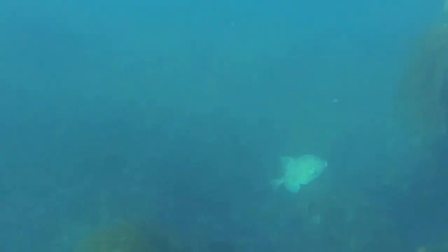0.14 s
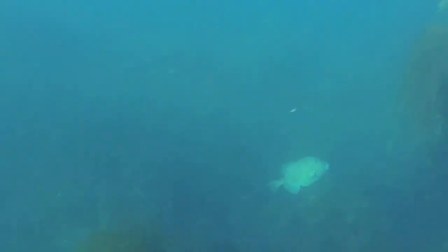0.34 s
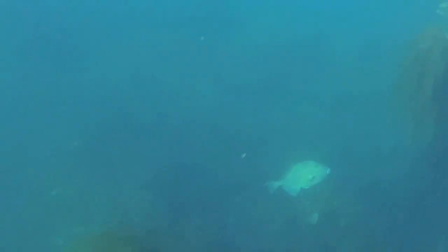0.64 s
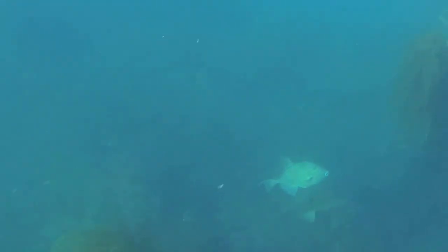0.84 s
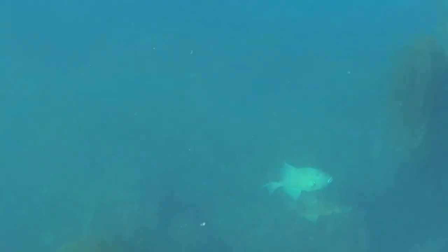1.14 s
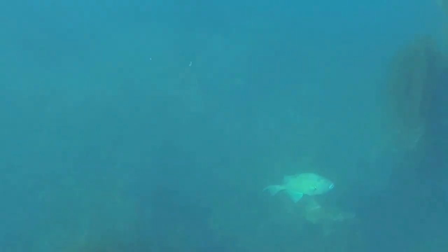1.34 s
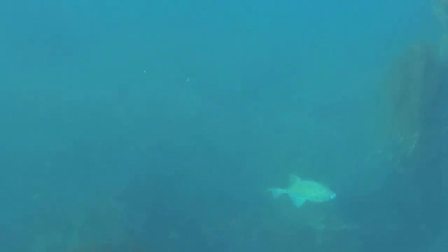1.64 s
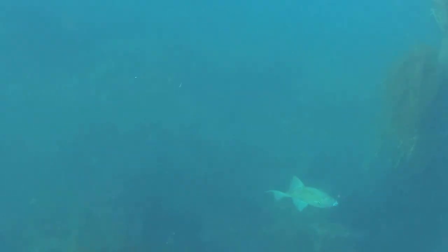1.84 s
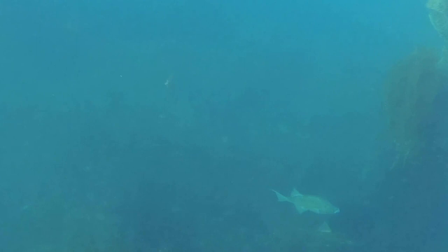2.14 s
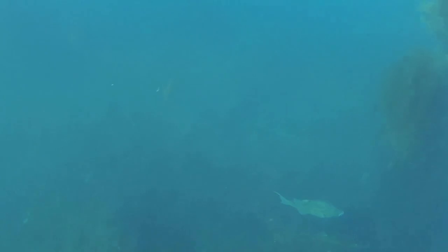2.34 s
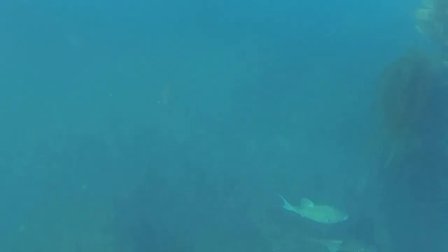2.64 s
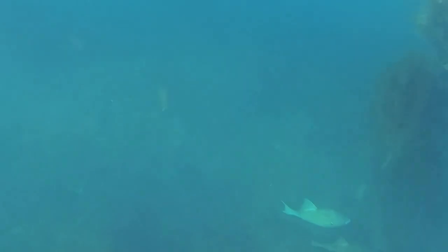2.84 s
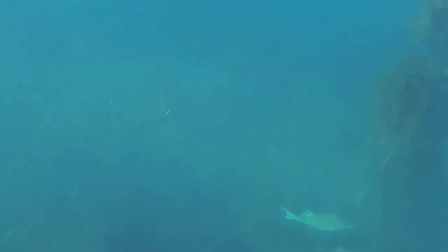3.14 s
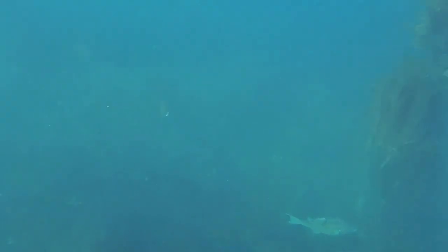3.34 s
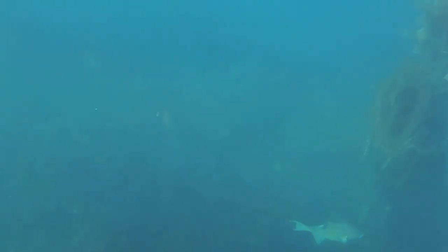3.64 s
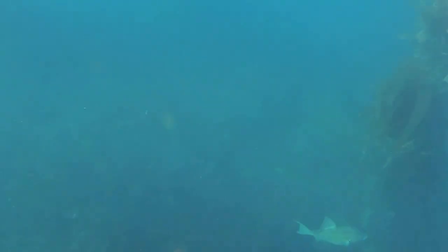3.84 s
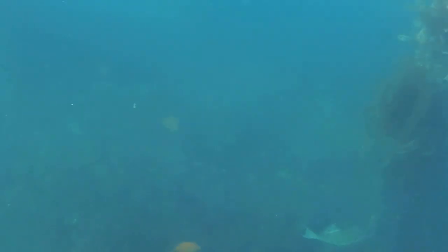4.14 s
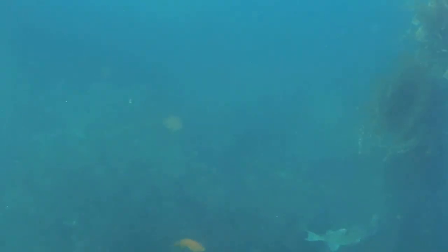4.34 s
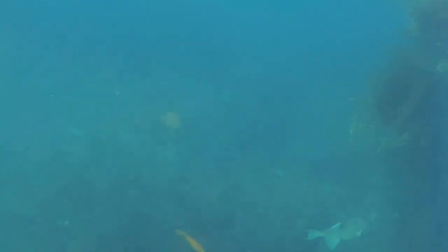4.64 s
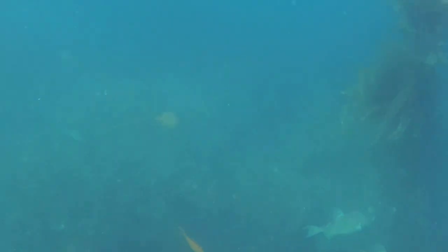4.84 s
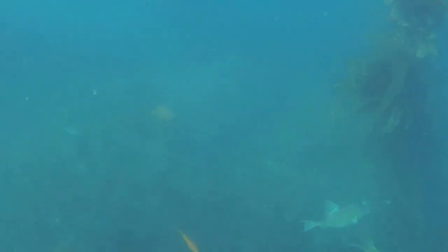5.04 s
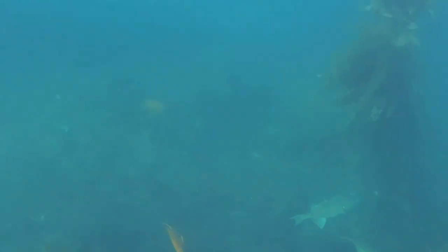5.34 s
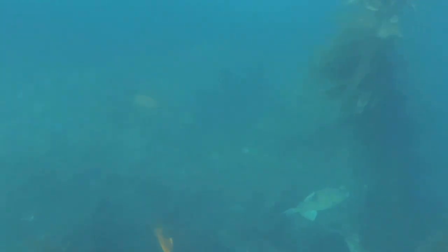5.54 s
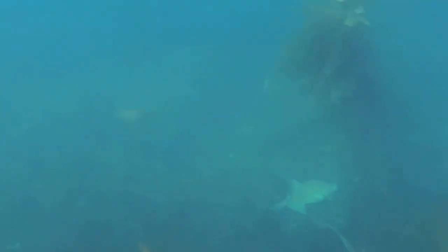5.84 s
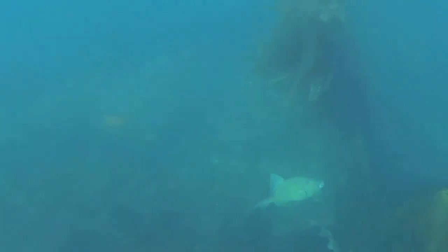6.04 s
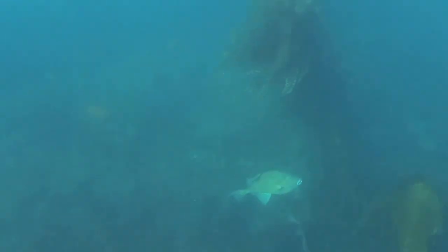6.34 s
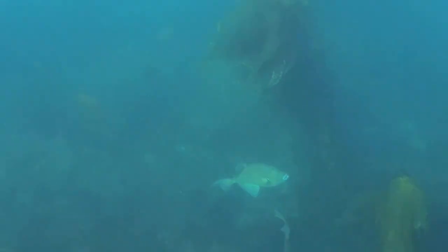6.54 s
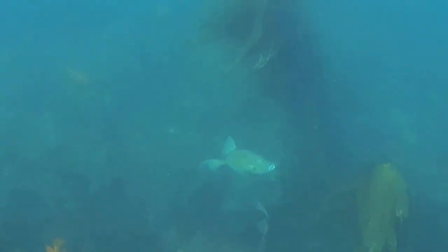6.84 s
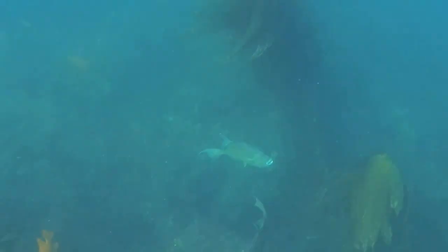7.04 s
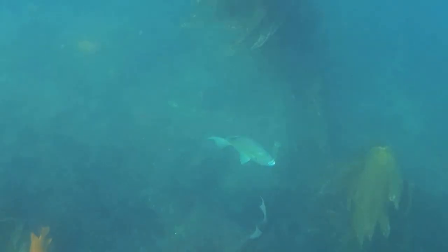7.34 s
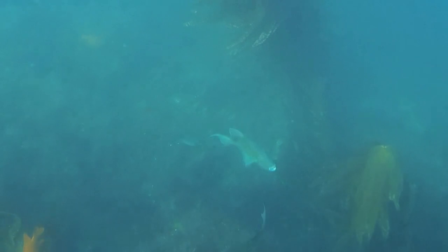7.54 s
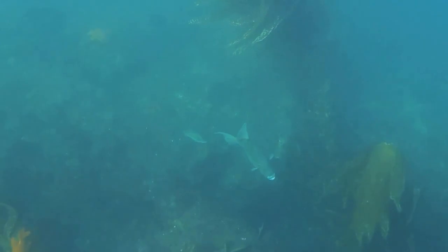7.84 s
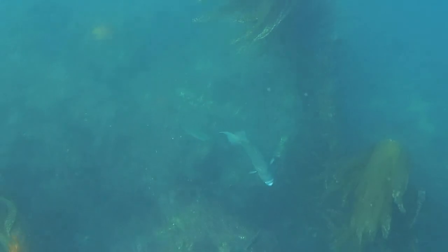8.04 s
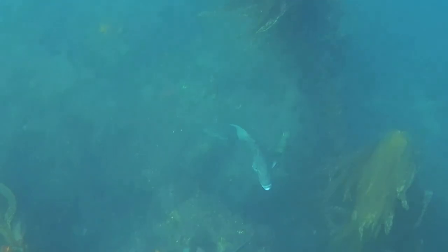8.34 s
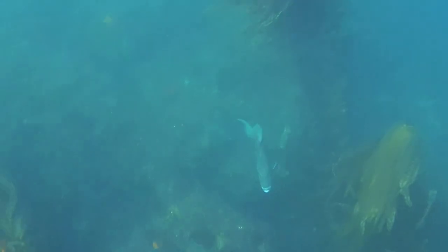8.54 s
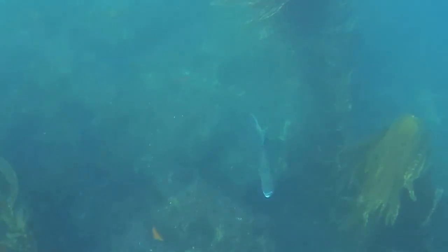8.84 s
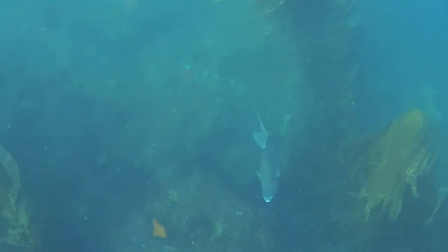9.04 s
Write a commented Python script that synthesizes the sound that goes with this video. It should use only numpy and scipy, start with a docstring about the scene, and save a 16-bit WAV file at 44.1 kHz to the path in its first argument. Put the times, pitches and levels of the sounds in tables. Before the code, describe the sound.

Underwater at a kelp reef, a camera in a watertight case picks up constant shrimp crackle: hundreds of faint ticks, with sharper nearby snaps several times a second. A thin grainy hiss lies behind. Low water rumble sways underneath, swelling with a dull slosh and scrape just past the middle. Occasional soft knocks and short bubble blips are heard close up.

```python
"""Snapping shrimp click all around a camera in a watertight case over a kelp reef.
Each near or mid-distance snap is a smeared pulse with one echo and fading scatter, alone or in a flurry;
the distant rest is grainy noise, a hiss. The wall of the case colours them all.
Swelling current and surges add filtered noise: a low rumble, a dull slosh and a scrape.
Soft knocks and small bubbles are short sine notes, the knocks with a noisy tap on the wall."""
import sys
import numpy as np
from scipy.fft import rfft, irfft, next_fast_len
from scipy.io import wavfile
from scipy.ndimage import uniform_filter1d, map_coordinates

SR = 44100
rng = np.random.default_rng(int(sys.argv[2]) if len(sys.argv) > 2 else 0)


def master_out(mix):
    """Clip the mix to full scale and print it as 16-bit PCM to the path in sys.argv[1]."""
    frames = np.transpose(np.atleast_2d(mix))
    ceiling = np.clip(frames, -1, 1)
    pcm = np.round(ceiling * 32767).astype(np.int16)
    wavfile.write(sys.argv[1], SR, pcm)


N = 405279


def amp(db):
    """Decibels to gain."""
    return 10 ** (np.asarray(db) / 20)


def unit(x):
    """Scale to rms 1."""
    return x / np.sqrt(np.mean(x ** 2) + 1e-20)


def along(points, hz):
    """Read (Hz, value) points on a log frequency axis."""
    f, value = np.transpose(points)
    return np.interp(np.log(hz + 1), np.log(f + 1), value)


def filtered(x, response):
    """Multiply the spectrum of x by a response of frequency, padded so that tails do not wrap."""
    m = 2 * next_fast_len(N // 2 + SR // 4)
    return irfft(rfft(x, m) * response(np.fft.rfftfreq(m, 1 / SR)), m)[:N]


def causal(db):
    """The minimum-phase response with these gains: it rings only after it is struck."""
    cepstrum = irfft(np.log(amp(db)))
    half = cepstrum.shape[-1] // 2
    cepstrum[..., 1:half] *= 2
    cepstrum[..., half + 1:] = 0
    return np.exp(rfft(cepstrum))


def placed(times, sounds):
    """Sum rows of sound, each starting at its time in seconds."""
    at = np.round(np.abs(times) * SR).astype(int)[:, None] + np.arange(sounds.shape[1])
    return np.bincount(at.ravel(), sounds.ravel(), N)[:N]


def wobble(rate):
    """A smooth random curve through `rate` knots a second."""
    return map_coordinates(rng.standard_normal(200), [np.arange(N) * rate / SR], mode="wrap")


def even(rows):
    """Give every row the same energy, 1."""
    return rows / np.sqrt(np.sum(rows ** 2, axis=1, keepdims=True))


def case_db(hz):
    """Gain of the case wall: a broad transmission curve plus its resonances and dead spots."""
    # What the case lets through. Each row: frequency in Hz, relative gain in dB.
    case = [(60, -34.5), (300, -31), (550, -18), (800, -13), (1300, -5.5), (1600, -1.5), (2300, -1.5),
            (3200, -6.5), (4800, -12.5), (7400, -20), (10500, -29.5), (12600, -29.5), (14200, -37),
            (15500, -56)]
    # Resonances (+) and dead spots (-). Each row: centre in Hz, half width in Hz, gain in dB.
    modes = [(99.5, 11.2, 16), (171.2, 6, 10), (427, 13, 2.5), (665.3, 53, 10), (957, 33.3, -14.5),
             (1083, 18, 6.5), (1262, 124, -18.5), (1550, 115, 5), (1944, 37, -18), (2103, 165, 4),
             (3690, 120, -4.5), (3873, 194, 6), (5150, 224, 7.5), (5530, 230, -4.5), (6320, 160, 3),
             (7510, 170, -6), (8360, 32, -33), (9420, 130, 6), (10740, 95, 9), (11880, 77, -28),
             (12020, 185, 14.5)]
    peaks = sum(db / (1 + ((hz - centre) / width) ** 2) for centre, width, db in modes)
    return along(case, hz) + peaks


def colony(level_db=-49, flutter_db=3.5):
    """Countless distant snaps merge into a grainy hiss that flutters a little."""
    # Colour of the colony before the case. Each row: frequency in Hz, relative gain in dB.
    far = [(100, 15), (300, 27.5), (680, 14), (1100, 9), (1700, 1.5), (3200, 3), (5200, 4), (8000, 12),
           (12000, 12), (14000, 14)]
    grains = rng.standard_normal(N) * amp(6 * rng.standard_normal(N))
    hiss = filtered(grains, lambda hz: causal(case_db(hz) + along(far, hz)))
    return amp(level_db + flutter_db * wobble(20)) * unit(hiss)


def flow():
    """Gains of rumble, slosh and scrape: each surge rises, holds and ebbs on top of the swelling current."""
    # Strength of the current past the case. Each row: time in seconds, rumble level in dB.
    current_points = [(0, -41.5), (2.5, -44), (4.2, -44), (4.9, -41), (5.2, -35), (6.2, -36), (7.5, -42.5),
                      (9.19, -39)]
    # Surges of water against the case. Each row: start in seconds, hold in seconds (counted from the
    # start, rise included), then the levels of rumble, slosh and scrape in dB.
    surges = [(2.066, 0.034, -34.5, -68, -80), (3.563, 0.13, -37.5, -44.5, -63),
              (5.124, 0.13, -35, -44.5, -50), (5.35, 0.17, -50, -46.5, -49.5),
              (5.565, 0.035, -41, -49, -61), (5.688, 0.097, -36, -62, -75), (6.485, 0.039, -34, -66, -80),
              (7.33, 0.14, -41, -61, -75), (8.072, 0.065, -37, -57, -70), (8.422, 0.035, -36, -53, -66),
              (8.506, 0.028, -35.5, -60, -70), (9.055, .1, -37, -63, -70)]
    swell_db, swell_rate = 1.06, 2.364  # depth of the random swell, knots a second
    slosh_rel_db, scrape_rel_db = -19.5, -25.5  # of the steady current, relative to its rumble
    rise_s, rumble_fade_s, slosh_fade_s = 0.017, 0.085, 0.051  # fades are time constants
    t = np.arange(N) / SR
    point_s, point_db = np.transpose(current_points)
    current = amp(np.interp(t, point_s, point_db) + swell_db * wobble(swell_rate))

    s, hold, sway_db, slosh_db, scrape_db = np.transpose(surges)[:, :, None]
    age = t - s
    rise = np.clip(age / rise_s, 0, 1)
    past = np.maximum(age - hold, 0)
    long = rise * np.exp(-past / rumble_fade_s)
    short = rise * np.exp(-past / slosh_fade_s)  # slosh and scrape stop sooner
    return (np.hypot(current, (amp(sway_db) * long).sum(0)),
            np.hypot(amp(slosh_rel_db) * current, (amp(slosh_db) * short).sum(0)),
            np.hypot(amp(scrape_rel_db) * current, (amp(scrape_db) * short).sum(0)))


def water():
    """Water sways the case as a rumble; a dense run of uneven pushes rings its wall as slosh and scrape."""
    # Rumble of the sway. Each row: frequency in Hz, relative density in dB per Hz.
    sway_colour = [(10, -8.5), (20, -4.5), (28, 4.5), (40, -12), (54, -6.5), (66, -16), (80, -29),
                   (160, -60), (400, -90)]
    # Slosh and scrape before the case. Each row: frequency in Hz, relative density in dB per Hz.
    slosh_colour = [(40, -0.5), (100, 2.5), (170, 2.5), (240, 3), (310, -9.5), (420, -13.5), (600, -27.5),
                    (900, -26), (2500, -100)]
    pushes_per_s, scrape_hz = 170, 310  # slosh lies below scrape_hz, scrape above
    sway_gain, slosh_gain, scrape_gain = flow()
    sway = unit(filtered(rng.standard_normal(N), lambda hz: amp(along(sway_colour, hz))))

    count = int(pushes_per_s * N / SR)
    slip, size = rng.standard_normal((count, 2)).T
    push_s = (np.arange(count) + .5 * slip) / pushes_per_s
    pushes = placed(push_s, np.cbrt(size)[:, None])
    wall = filtered(pushes, lambda hz: causal(case_db(hz) + along(slosh_colour, hz)))
    slosh = filtered(wall, lambda hz: 1 / (1 + (hz / scrape_hz) ** 8))
    scrape = wall - slosh
    return sway_gain * sway + slosh_gain * unit(slosh) + scrape_gain * unit(scrape)


def snaps(times, db, treble_tilt, scatter_db, scatter_t60, size=2048):
    """Each snap is a cavity collapsing: a pulse smeared by several paths through the case wall, one near echo
    and scatter from the reef."""
    t, hz = np.arange(size) / SR, np.fft.rfftfreq(size, 1 / SR)
    shape = (len(times), size)
    lag, strength, path, spread = rng.random((len(times), 4, 1)).transpose(1, 0, 2)
    late = lambda s: np.exp(-2j * np.pi * hz * s)  # a delay of s seconds
    close = np.interp(db, [-28, -19], [0, 1])[:, None]  # loud snaps count as close

    # the dull click of the claw comes just before the sharp collapse
    claw = .6 * late(.0001) / (1 + 1j * hz / 3000)
    collapse = .65 * late(.0002 + .0003 * lag)

    # paths of nearly equal length blur it over a millisecond or two
    blur_s = .00018 + .00035 * spread
    blur = even(rng.standard_normal(shape) * (t / blur_s) ** 2 * np.exp(-t / blur_s))
    blur = (.5 + .7 * spread) * (1 - .5 * close) * blur

    # rock behind the shrimp sends back an inverted, duller echo, stronger when close
    bounce = (.15 + .35 * strength + .25 * close) * late(.0013 + .0008 * path)
    bounce = bounce / (1 + (hz / 4500) ** 4)
    crack = (claw + collapse + rfft(blur)) * (1 - bounce)

    # faint snaps keep the colour of their paths; in loud ones its broad balance is evened out
    direct = np.interp(db, [-38, -26], [.1, .85])[:, None]
    broad_power = uniform_filter1d(np.abs(crack) ** 2, size=140, axis=1)
    crack = crack * causal(-10 * direct * np.log10(broad_power))
    crack = crack / np.sqrt(np.mean(np.abs(crack) ** 2, axis=1, keepdims=True))

    # rough rock and the surface return a spiky, fading spray of duller copies
    spray_fade = amp(-60 * t / scatter_t60) * (1 - np.exp(-t / .004))
    spray = even(rng.standard_normal(shape) ** 3 * spray_fade)
    spray = rfft(spray) * amp(scatter_db - 3 * close) / (1 + 1j * hz / 7000)

    # the size of the cavity tilts the treble; the very top is weaker in loud snaps and varies
    shelf = hz ** 4 / (hz ** 4 + 3000 ** 4)
    top = hz ** 10 / (hz ** 10 + 6300 ** 10)
    shelf_db = 1.39 * treble_tilt
    top_db = -.45 * (db + 33) - .4 * treble_tilt + 3.2 * rng.standard_normal(len(times))
    colour = causal(case_db(hz) + shelf_db[:, None] * shelf + top_db[:, None] * top)

    clicks = irfft((crack + spray) * colour)
    onset = np.sqrt(np.mean(clicks[:, t < .004] ** 2, axis=1))  # rms of the first 4 ms
    return placed(times, clicks * (amp(db) / onset)[:, None])


def crowd(count=900):
    """Shrimp farther off snap at scattered moments, fainter and on average brighter with distance."""
    slip, ring = rng.random((count, 2)).T
    when = (np.arange(count) + 3 * slip) / count * N / SR
    distance = np.log10(1 + 8 * ring)  # in decades
    variety = 3.5 * rng.standard_normal(count)
    treble_tilt = .5 + 3 * distance + variety
    return snaps(when, -35 - 13 * distance, treble_tilt, scatter_db=-4, scatter_t60=0.063)


def near_shrimp():
    """The closest shrimp, on the rocks just below: sharp cavity collapses, each at its own moment."""
    # Each row: start in seconds, rms level of the first 4 ms in dB, treble tilt (relative; + is brighter).
    near = [(0.061, -33, 3), (0.0926, -25, -7.5), (0.1755, -25.5, -2), (0.225, -29.5, 6),
            (0.2403, -25.5, -4), (0.272, -27, -0.5), (0.295, -37, 2), (0.347, -30.5, 1),
            (0.3883, -26.5, -1), (0.4247, -30.5, -0.5), (0.51, -26, -0.5), (0.548, -30.5, 10),
            (0.609, -33.5, 8), (0.647, -24, 3), (0.669, -30.5, 6), (0.6821, -28.5, -8),
            (0.7604, -32.5, -12), (0.7828, -25.5, -14), (0.85, -33, -4), (0.9122, -31, 0),
            (0.9446, -23.5, -3), (0.9821, -23.5, -1), (0.9897, -28, 2), (1.1767, -37, 7),
            (1.1862, -32.5, -2), (1.2254, -26, 1), (1.244, -28, 1), (1.253, -28.5, -17), (1.2883, -31, -2),
            (1.329, -30, 7), (1.3329, -21.5, 4.5), (1.391, -30.5, 2), (1.5335, -22, 0.5), (1.581, -21.5, 1),
            (1.671, -23.5, -5), (1.707, -28.5, -4), (1.7232, -29.5, -6), (1.7567, -30.5, 4),
            (1.8138, -32.5, -3), (1.8251, -19, -6.5), (1.8983, -35, 0), (1.9063, -33, -11),
            (1.9228, -26.5, 3), (1.9507, -29.5, 0), (1.96, -30, -4), (2.023, -32.5, -6), (2.038, -32.5, -1),
            (2.16, -36, 3), (2.183, -31, 1), (2.253, -29.5, 1), (2.2622, -29.5, -8), (2.2958, -33.5, 5),
            (2.3791, -35, 6), (2.5918, -34.5, -3), (2.6131, -31, -1), (2.6606, -27.5, 1),
            (2.6774, -23.5, 1.5), (2.7679, -26, -8), (2.795, -32.5, 3), (2.8135, -32, 1), (2.8337, -33, 1),
            (3.141, -30, -8), (3.171, -33.5, 5), (3.2081, -28.5, 4), (3.2662, -30.5, 3),
            (3.3695, -28.5, -3), (3.4286, -32.5, 3), (3.4845, -32, 2), (3.491, -25.5, 4), (3.508, -33, 4),
            (3.5235, -38, -2), (3.736, -30, -1), (3.833, -28, -1), (3.894, -30.5, -7), (3.975, -24.5, -18),
            (3.9847, -27.5, 1), (4.0222, -31.5, 1), (4.1415, -26.5, -0.5), (4.1746, -17, 0),
            (4.1814, -24, -8), (4.206, -34, 0), (4.3982, -34, 0), (4.528, -33, 0), (4.5439, -20, -5.5),
            (4.586, -33, 9), (4.6027, -24, -13), (4.6199, -23, -16), (4.747, -25.5, 4), (4.781, -28.5, 0),
            (4.801, -29, -4), (4.813, -29, -3), (4.8666, -33.5, -6), (4.9244, -34, 2), (4.9618, -35, 4),
            (4.9746, -23, -1.5), (5.0264, -31.5, 3), (5.0664, -31.5, -8), (5.0803, -30, -7),
            (5.3505, -28, -17), (5.356, -31, 0), (5.3647, -23, -8), (5.3735, -31, -4), (5.385, -35, 0),
            (5.3907, -24.5, 1.5), (5.5085, -31, 1), (5.5626, -32, -9), (5.572, -32, 2), (5.6369, -22.5, -9),
            (5.651, -31.5, -1), (5.711, -31, 3), (5.731, -22.5, -3), (5.753, -28, -2), (5.7583, -30, 4),
            (5.833, -27, -1), (5.894, -29, -1), (5.923, -35, -10), (5.9673, -35.5, 4), (6.084, -28, -9),
            (6.1892, -33, -4), (6.2106, -29, 0), (6.297, -25.5, -2.5), (6.3358, -32.5, -8),
            (6.408, -19, -4.5), (6.4186, -21.5, -4), (6.489, -19.5, -0.5), (6.4963, -25, -23),
            (6.5178, -33, -4), (6.5684, -27.5, 0), (6.579, -29.5, 0), (6.6046, -36, 0),
            (6.6368, -31.5, -12), (6.677, -31, 5), (6.6872, -37, -2), (6.751, -26, -7), (6.774, -30, -2),
            (6.7919, -23, 1.5), (6.8252, -33, 3), (6.8847, -33.5, -2), (6.925, -29, 11), (6.9537, -28, 0.5),
            (6.9829, -26, -2), (7.0168, -32, -6), (7.0503, -34, -23), (7.133, -29.5, 1),
            (7.1725, -21.5, -6), (7.223, -29.5, 4), (7.2712, -28, 1), (7.2942, -28.5, 2.5),
            (7.4057, -26.5, -3.5), (7.4156, -30, -2), (7.4713, -29.5, -1), (7.6091, -31.5, -3),
            (7.6913, -34, 2), (7.7325, -26, 0), (7.76, -30, -3), (7.8533, -22, -0.5), (7.9112, -32.5, -1),
            (8.0133, -25, 2), (8.0231, -33.5, 3), (8.1164, -34, 4), (8.162, -31, 3), (8.1719, -29.5, -2),
            (8.3097, -22.5, 4.5), (8.3264, -22, -4), (8.4385, -35.5, 3), (8.6272, -28, -5.5),
            (8.7018, -31.5, -1), (8.7534, -30.5, 0), (8.7578, -29.5, 2), (8.7696, -25, 1),
            (8.7793, -30, -3), (8.8212, -31, -8), (8.869, -25, -2), (8.9193, -32, 7), (8.9506, -32, -2),
            (8.9828, -31, -1), (9.0192, -34, 1), (9.052, -33.5, 6), (9.099, -26, -4), (9.172, -22.5, -1)]
    s, db, treble_tilt = np.transpose(near)
    return snaps(s, db, treble_tilt, scatter_db=-5.5, scatter_t60=0.046)


def bubbles(attack_s=0.0032, faint_db=-42, faint_hz=580, faint_t60=.045, count=45):
    """Freed bubbles swell into a short decaying sine note; fainter ones blip at random between them."""
    # Each row: start in seconds, level in dB before swell and decay, pitch in Hz, 60 dB decay in seconds.
    clear = [(1.078, -30.5, 703, 0.052), (1.192, -29, 695, 0.036), (1.369, -25.5, 686, 0.035),
             (1.394, -25, 680, 0.027), (2.4965, -16.5, 684, 0.026), (2.501, -31, 870, 0.031),
             (2.511, -38, 680, 0.064), (3.715, -34, 693, 0.066), (4.098, -23.5, 690, 0.031),
             (4.296, -27.5, 694, 0.039), (5.170, -32, 710, 0.072), (5.245, -35.5, 438, 0.12),
             (5.346, -28, 430, 0.11), (5.412, -22.5, 655, 0.096), (7.719, -27.5, 703, 0.11)]
    when, size, pitch = rng.random((count, 3)).T
    faint = np.column_stack([when * N / SR,
                             faint_db + 10 * (size - .5),
                             faint_hz * 2 ** (pitch - .5),  # within half an octave
                             np.full(count, faint_t60)])
    s, db, hz, t60 = np.vstack([clear, faint]).T[:, :, None]
    t = np.arange(SR // 5) / SR
    envelope = amp(db - 60 * t / t60) * (1 - np.exp(-t / attack_s))
    return placed(s[:, 0], envelope * np.sin(2 * np.pi * hz * t))


def flurries(treble_tilt=-4.5, snaps_per_s=130):
    """Now and then a patch of shrimp snaps in a quick, dense run of small cavity collapses."""
    # Each row: start in seconds, length in seconds, middle level of a snap (rms of its first 4 ms) in dB.
    runs = [(0.537, 0.019, -31.5), (1.892, 0.094, -46), (2.246, 0.057, -37.5), (3.96, 0.022, -31.5),
            (4.37, 0.074, -42.5), (7.038, 0.041, -37), (7.641, 0.12, -43)]
    rows = []
    for start, length, run_db in runs:
        n = max(1, round(length * snaps_per_s))
        rows += [(start + length * k / n, run_db) for k in range(n)]
    s, db = np.transpose(rows)
    slip, size, tilt = rng.standard_normal((len(s), 3)).T
    return snaps(s + .002 * slip, db + 2 * size, treble_tilt + 3 * tilt, scatter_db=3.0, scatter_t60=0.035)


def knocks(cycles=0.39, contact_s=0.00043, ring_db=-19, ring_hz=675, tap_db=18, tap_hz=800):
    """Each knock is a brief sine push with a dull tap on the wall; it leaves a low mode of the case ringing."""
    # Soft knocks on the case. Each row: start in seconds, level of the push in dB, pitch in Hz.
    case_knocks = [(0.55, -29.5, 228), (0.5502, -24.5, 580), (1.033, -34, 463), (1.275, -34, 450),
                   (2.4931, -27, 455), (2.496, -35, 195), (2.892, -41, 288), (3.073, -34.5, 584),
                   (3.752, -42, 400), (3.9583, -32.5, 500), (4.074, -40.5, 400), (4.8188, -29.5, 433),
                   (5.0212, -34, 480), (5.577, -42, 240), (5.761, -29.5, 258), (6.11, -41, 296),
                   (6.525, -25.5, 543), (6.923, -33.5, 483), (6.971, -33, 160), (6.980, -31, 370),
                   (7.39, -34, 359.7), (8.39, -28, 168), (8.392, -35, 620), (8.435, -38, 250),
                   (8.447, -48, 280), (8.528, -40, 224), (9.17, -29, 430)]
    ring_t60, chatter_t60 = .1, .08  # 60 dB decays in seconds
    s, db, hz = np.transpose(case_knocks)[:, :, None]
    t = np.arange(SR // 8) / SR
    age = t / (contact_s + cycles / hz)  # the push is strongest at age 1
    push = age * np.exp(1 - age) * np.sin(2 * np.pi * hz * t)
    # higher knocks excite the ringing mode more
    ring = amp(ring_db - 60 * t / ring_t60) * hz / ring_hz * np.sin(2 * np.pi * ring_hz * t)

    # the wall chatters briefly after the first tap
    chatter = rng.standard_normal(push.shape) ** 3 * amp(-60 * t / chatter_t60)
    contact = (t == 0) + .8 * even(chatter)
    strikes = placed(s[:, 0], amp(db + tap_db) * contact)
    dull_db = lambda f: -20 * np.log10(1 + (f / tap_hz) ** 4)
    taps = filtered(strikes, lambda f: causal(case_db(f) + dull_db(f)))
    return placed(s[:, 0], amp(db) * (push + ring)) + taps


def scene():
    """Shrimp from close by to far away and the water at the case, on one microphone."""
    shrimp = colony() + crowd() + near_shrimp() + flurries()
    return (shrimp + water() + bubbles() + knocks())[None]


def record(dry):
    """The camera keeps nothing above its band limit."""
    top_hz = 15600
    return filtered(dry[0], lambda hz: hz < top_hz)[None]


dry = scene()
out = record(dry)
master_out(out)
```